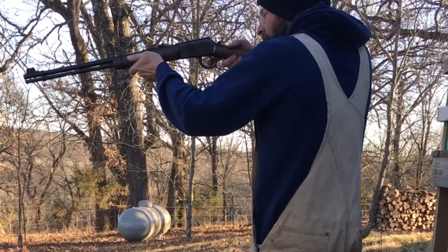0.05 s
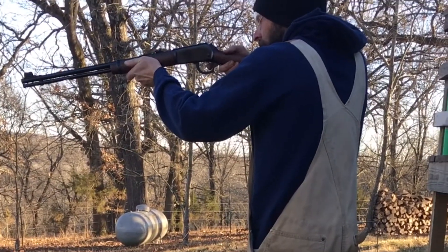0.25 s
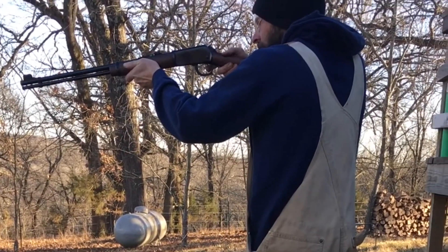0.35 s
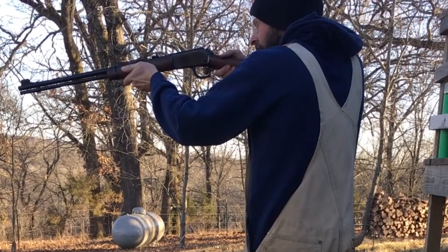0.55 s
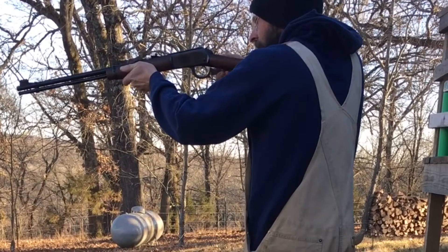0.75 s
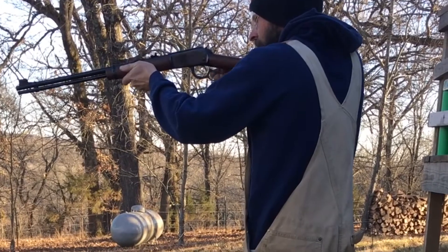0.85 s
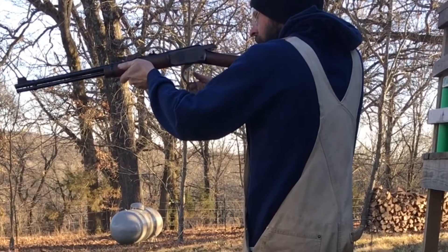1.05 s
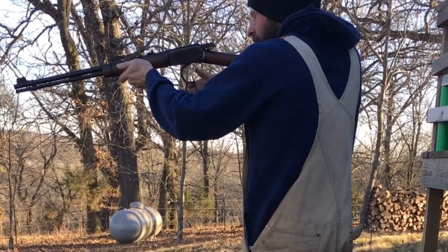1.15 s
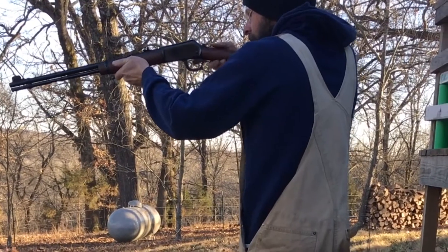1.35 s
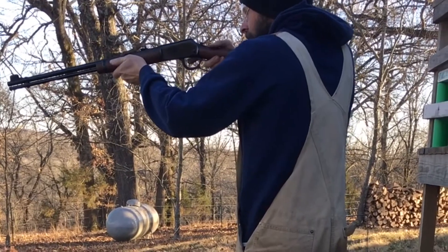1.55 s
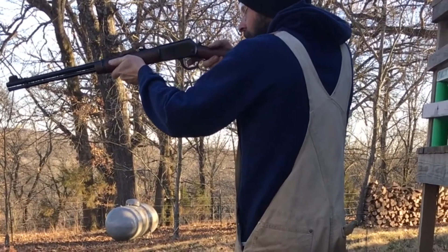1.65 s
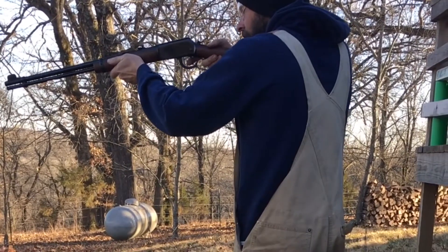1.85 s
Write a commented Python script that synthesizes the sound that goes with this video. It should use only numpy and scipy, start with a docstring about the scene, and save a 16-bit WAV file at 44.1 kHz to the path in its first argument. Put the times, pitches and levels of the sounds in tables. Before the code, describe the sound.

A rifle shot, a bullet hitting metal, echoes, then the lever clicking open and shut.

```python
"""A faint hum, like a far engine, lies under quiet outdoor air at the edge of a wood.
The hammer of a small-calibre lever-action rifle snaps, and the muzzle gas drives out one sharp report.
A moment later the bullet strikes metal and sets its modes ringing.
The report reflects off the trees as separate slaps and a rolling echo. As that dies away, the lever is
thrown open and snapped shut, steel on steel, and the spent case tings faintly on the ground."""
import sys
import numpy as np
from scipy import signal
from scipy.fft import rfft, irfft
from scipy.io import wavfile
from scipy.ndimage import uniform_filter1d

SR = 44100
rng = np.random.default_rng(int(sys.argv[2]) if len(sys.argv) > 2 else 0)


def waveform_to_disk(signal):
    """Save audio, clipped to [-1, 1], as 16-bit WAV at the path in sys.argv[1]."""
    frames = np.transpose(np.atleast_2d(signal))
    scaled = np.clip(frames, -1, 1) * 32767
    samples = np.round(scaled).astype(np.int16)
    wavfile.write(sys.argv[1], SR, samples)


N = 83790
TIME = np.arange(N) / SR

# pressure fronts: (time [s], level [dB], positive phase [s])
SHOCK_FRONTS = [(0.2185, -3, 0.00012), (0.2197, 1, .00055), (0.2224, -6, 0.00018), (0.2228, -3, 0.00064)]
# spectra of the muzzle gas and of its scatter from the ground: (frequency [Hz], level [dB])
GAS_SPECTRUM = [(40, -9), (120, -2), (230, 2.5), (430, 3.5), (850, -2.5), (1250, 5.5), (2000, 4),
                (2900, -1.5), (7000, -1.5), (11000, -5), (16000, -8)]
GROUND_SPECTRUM = [(40, -14.5), (200, -2.5), (700, -3.5), (1400, 6), (3000, -0.5), (7000, -2), (16000, -6)]
BLAST_S, BLAST_RISE_S, BLAST_HOLD_S, BLAST_T60, BLAST_DB = .216, .0045, .018, .12, -14.5
PUFF_S, PUFF_HZ, PUFF_WIDTH_S, PUFF_DB = .2221, 201, .0027, -6.5

def muzzle_blast():
    """Sudden expansion of gas: Friedlander waves and a low puff in a noisy rush that the ground scatters."""
    since = TIME - PUFF_S
    out = amp(PUFF_DB) * np.cos(2 * np.pi * PUFF_HZ * since) * np.exp(-(since / PUFF_WIDTH_S) ** 2)
    for s, db, positive_s in SHOCK_FRONTS:
        age = TIME / positive_s
        add(out, s, amp(db) * (1 - age) * np.exp(-age))
    rise = np.minimum(TIME / BLAST_RISE_S, 1)
    decay = np.exp(-np.log(1000) * np.maximum(TIME - BLAST_HOLD_S, 0) / BLAST_T60)
    add(out, BLAST_S, amp(BLAST_DB) * rise * decay * noise(GAS_SPECTRUM))
    add(out, BLAST_S + BLAST_HOLD_S, amp(-25.5) * burst(fade(t60=.4), GROUND_SPECTRUM))
    return out


BOOM_S, BOOM_DB = .2234, -4.5

def boom(start_hz=80, sag_s=.031, peak_s=.0072):
    """A damped low oscillation of pressure that begins with rarefaction and sags in pitch."""
    cycles = start_hz * sag_s * (1 - np.exp(-TIME / sag_s))
    age = TIME / peak_s
    return -np.sin(2 * np.pi * cycles) * (age * np.exp(1 - age)) ** .85


# spectrum of the impact: (frequency [Hz], level [dB])
IMPACT_SPECTRUM = [(50, 5), (250, -6.5), (430, -9.5), (620, -2), (850, -9), (1400, 1), (2000, 6.5),
                   (3500, -1), (8500, -2), (10500, -7), (16000, -6.5)]
# modes of the struck metal: (frequency [Hz], level [dB], T60 [s])
TARGET_MODES = [(1394, -15, .16), (1980, 1.5, 0.01), (2667, -0.5, .04), (2768, -9, 0.1), (3190, -16, .07),
                (4675, -10.5, 0.09), (6700, -0.5, 0.078), (6890, -2.5, 0.079), (8910, -6, .055),
                (11540, -12, .15), (12520, -8, 0.11), (14510, -14.5, .11)]

def bullet_hit(hit_s=.2873):
    """Impact excitation: a smack starts the metal's free vibration, which reverberates among the trees."""
    out = np.zeros(N)
    metal = amp(-13) * ring(TARGET_MODES)
    trees = rng.standard_normal(N) * fade(t60=1.3)
    add(out, hit_s, amp(-10.5) * burst(fade(t60=.05), IMPACT_SPECTRUM))
    add(out, hit_s, metal)
    add(out, hit_s, amp(-23.5) * signal.fftconvolve(metal, unit_energy(trees)))
    return out


# contacts of lever and bolt: (time [s], level [dB], tilt [dB/octave], T60 [s])
CONTACTS = [(.888, -54, -1, 0.11), (0.9018, -36, -2.5, .012), (0.93, -47, -2, 0.038),
            (0.9338, -36.5, -1.5, 0.018), (0.937, -43, -3, 0.14), (0.9556, -23, -2, 0.026),
            (1.198, -50, 6, 0.02), (1.205, -38.5, -0.5, 0.02), (1.209, -36.5, -2.5, 0.04),
            (1.2134, -44.5, -2, .02), (1.2242, -44, -1.5, 0.022), (1.237, -45, -5, 0.071),
            (1.2501, -37.5, -2.5, 0.028), (1.2545, -16, 2, 0.015), (1.2588, -19, 0.5, 0.021),
            (1.38, -62, -1.5, 0.36), (1.532, -60, 3.5, 0.1), (1.826, -66, 8, 0.039)]
# spectrum of a steel contact: (frequency [Hz], level [dB])
CONTACT_SPECTRUM = [(30, -35), (150, -22.5), (400, -18.5), (620, -10.5), (900, -3), (1150, 0), (1500, -1.5),
                    (2200, 2.5), (3200, -4), (4500, -1), (7500, 0), (10500, -2), (16000, -9.5)]
# modes of the receiver and of the small steel parts: (frequency [Hz], level [dB], T60 [s])
RECEIVER_MODES = [(606, -24, 0.27), (1229, -9, .08), (1422, -9.5, .04), (2055, -13, 0.043),
                  (2600, -9.5, 0.028), (3255, -7, 0.033), (4490, -7.5, 0.032), (5120, -11, 0.018),
                  (6090, -12, .025), (6850, -3.5, .02), (7220, -1, .02), (9860, -2.5, 0.016)]
SMALL_PART_MODES = [(10700, -0.5, 0.013), (11400, 1.5, 0.019), (12800, -14, 0.23), (13600, 3, 0.014),
                    (15420, -2, 0.018)]
# strikes on the small parts: (time [s], level [dB])
SMALL_PART_STRIKES = [(.9015, -37.5), (0.9338, -35), (1.2586, -40)]
# the lever meets its end stops: (time [s], level [dB], tilt [dB/octave])
END_STOPS = [(.9559, -20, 10), (1.209, -40, 7), (1.2545, -22.5, -5)]

def lever_action(grit_db=3.5, low_cut_hz=514):
    """Impact and friction: steel ticks, scrapes and rings; parts this small radiate little bass."""
    out = np.zeros(N)
    tick = amp(2.5) * fade(t60=.0012)
    for s, db, tilt_db, t60 in CONTACTS:
        grit = unit_rms(amp(grit_db * np.minimum(rng.exponential(1, N), 4)))
        add(out, s, amp(db) * burst(fade(t60) * grit + tick, CONTACT_SPECTRUM, tilt_db))
        add(out, s, amp(db - 6.5) * ring(RECEIVER_MODES, tilt_db))
    for s, db in SMALL_PART_STRIKES:
        add(out, s, amp(db) * ring(SMALL_PART_MODES))
    for s, db, tilt_db in END_STOPS:
        add(out, s, amp(db) * stock_knock(tilt_db))
    return signal.sosfilt(signal.butter(2, low_cut_hz, "highpass", fs=SR, output="sos"), out)


# hollow modes of the stock: (frequency [Hz], level [dB], T60 [s])
STOCK_MODES = [(963, -10.5, 0.049), (1179, -2.5, 0.045), (1405, -16, 0.04)]

def stock_knock(tilt_db):
    """Modal superposition: damped sines sum to a hollow clack, tilted about the middle mode."""
    middle_hz = np.median([mode[0] for mode in STOCK_MODES])
    return sum(amp(db + tilt_db * np.log2(hz / middle_hz)) * fade(t60) * np.sin(2 * np.pi * hz * TIME)
               for hz, db, t60 in STOCK_MODES)


# strikes of hammer and firing pin: (time [s], level [dB], tilt [dB/octave])
HAMMER_STRIKES = [(0.1965, -20.5, -1), (.208, -25, -1.5)]
# spectrum of their dry snap: (frequency [Hz], level [dB])
SNAP_SPECTRUM = [(40, -5.5), (300, 7), (1000, 1), (2000, 0), (4000, -9), (9000, -10.5), (16000, -18)]

def hammer(ground_delay_s=.0033):
    """Direct and reflected paths: each snap arrives twice, once off the ground, with a brief rattle."""
    out = np.zeros(N)
    for s, db, tilt_db in HAMMER_STRIKES:
        add(out, s, amp(db) * pulse(SNAP_SPECTRUM, tilt_db))
        add(out, s + ground_delay_s, amp(db - 1.5) * pulse(SNAP_SPECTRUM))
        add(out, s, amp(db - 14) * burst(fade(t60=.037), CONTACT_SPECTRUM))
    return out


# decay of the longer tail from the surroundings: (frequency [Hz], T60 [s])
TAIL_DECAY = [(100, 0.27), (1200, 0.41), (4000, 0.29), (15000, 0.27)]

def nearby_scatter(sound):
    """Reverberation by convolution: quick scatter from things close by, and a faint longer tail."""
    early = rng.standard_normal(N) * fade(t60=.11)
    late = die_away(rng.standard_normal(N), TAIL_DECAY)
    response = amp(-13) * unit_energy(early) + amp(-22) * unit_energy(late)
    return signal.fftconvolve(sound, response)[:N]


# spectrum of the report among the twigs: (frequency [Hz], level [dB])
TWIG_SPECTRUM = [(40, -1.5), (150, 7.5), (450, -0.5), (1400, 7.5), (3000, 4), (7000, -0.5), (12000, -1),
                 (16000, -5.5)]
# its decay: (frequency [Hz], T60 [s])
TWIG_DECAY = [(100, 2.7), (1500, 0.9), (4000, 1.7), (8000, 1.35), (16000, 0.98)]

def twig_wash(rise_s=.02):
    """Diffuse scattering: the nearest twigs spread the report into a bright wash."""
    out = np.zeros(N)
    wash = die_away(noise(TWIG_SPECTRUM), TWIG_DECAY)
    add(out, BLAST_S, amp(-34) * np.minimum(TIME / rise_s, 1) * wash)
    return out


# echoes off trunks and buildings: (time [s], front level [dB], scatter level [dB], scatter T60 [s])
SLAPS = [(0.3553, -23, -28, 0.057), (0.4024, -27.5, -43, 0.019), (0.463, -37, -30.5, 0.18),
         (0.4965, -4.5, -22, 0.073), (.5021, -11.5, -23.5, 0.042), (.513, -25, -29.5, 0.2),
         (.574, -14.5, -31, 0.039), (.608, -19, -33, 0.057), (0.6125, -20.5, -31.5, 0.17),
         (.686, -20.5, -37, 0.031), (.71, -25, -32, 0.08), (.76, -21, -39.5, 0.13)]
# spectrum of an echo: (frequency [Hz], level [dB])
SLAP_SPECTRUM = [(30, -35), (150, -15.5), (400, -15.5), (650, -3.5), (1300, -1.5), (2000, -3.5),
                 (3000, -14.5), (5000, -25), (16000, -56)]

def slap_echoes(blur_s=.00007, boom_return_s=.49):
    """Discrete reflections: each front, rounded by distance, trails scatter; the boom returns once."""
    out = np.zeros(N)
    blur = signal.windows.gaussian(21, blur_s * SR)
    front = np.convolve(pulse(SLAP_SPECTRUM), blur / blur.sum())
    for s, front_db, scatter_db, t60 in SLAPS:
        add(out, s, amp(front_db) * front)
        add(out, s, amp(scatter_db) * burst(fade(t60), SLAP_SPECTRUM))
    add(out, boom_return_s, amp(-36) * boom())
    return out


# envelope of the wood's rolling echo: (time [s], level [dB])
ROLL_ENVELOPE = [(.22, -100), (.31, -38), (.42, -45), (.53, -37.5), (.64, -34.5), (.77, -37.5), (.9, -43),
                 (1.02, -50), (1.18, -61.5), (1.4, -82), (1.9, -91)]
# spectrum of one trunk's reflection: (frequency [Hz], level [dB])
TRUNK_SPECTRUM = [(100, -30.5), (380, -26), (620, -7), (850, -4.5), (1350, 0.5), (1900, -6.5),
                  (2600, -17.5), (4000, -28), (8000, -46), (16000, -61)]

def rolling_echo(trunks_per_s=3500, spread_db=4):
    """Incoherent summation: randomly timed reflections from countless trunks merge into a roll."""
    arrivals = (rng.random(N) < trunks_per_s / SR) * rng.choice([-1, 1], N)
    strengths = amp(spread_db * np.clip(rng.standard_normal(N), -2, 2))
    roll = unit_rms(signal.fftconvolve(arrivals * strengths, pulse(TRUNK_SPECTRUM))[:N])
    return roll * amp(np.interp(TIME, *np.transpose(ROLL_ENVELOPE)))


# the case lands and bounces: (time [s], level [dB])
CASE_IMPACTS = [(1.44, -63), (1.875, -74)]
# modes of the case: (frequency [Hz], level [dB], T60 [s])
BRASS_MODES = [(3100, -5, .09), (4300, 0.5, 0.25), (5123, -10, .1), (9550, -14, 0.17), (12600, -26, .15)]

def spent_case():
    """Free vibration of a brass shell: a faint ting at each landing."""
    out = np.zeros(N)
    for s, db in CASE_IMPACTS:
        add(out, s, amp(db) * ring(BRASS_MODES))
    return out


# course of the hum: (time [s], pitch [Hz], level [dB])
HUM_COURSE = [(0, 117.2, -54.5), (.18, 121.5, -61), (.3, 114, -69), (.65, 116, -62.5), (.78, 115.7, -51.5),
              (1.3, 116.5, -52.5), (1.7, 115.2, -54), (1.9, 112.8, -55.5)]
# its partials: (multiple of the pitch [1], level [dB])
HUM_PARTIALS = [(.5, -14.5), (1, 1.5), (1.5, -29), (2, -16)]

def hum(waver_depth=.0023):
    """Frequency modulation: the partials of a low tone waver together; the level dips around the shot."""
    times, hz, db = np.transpose(HUM_COURSE)
    waver = unit_rms(uniform_filter1d(rng.standard_normal(N), size=3000))
    cycles = np.cumsum(np.interp(TIME, times, hz) * (1 + waver_depth * waver)) / SR
    tone = sum(amp(level) * np.sin(2 * np.pi * (multiple * cycles + rng.random()))
               for multiple, level in HUM_PARTIALS)
    return unit_rms(tone) * amp(np.interp(TIME, times, db))


# spectrum of the outdoor air: (frequency [Hz], level [dB])
AIR_SPECTRUM = [(20, -12), (40, -0.5), (65, 11.5), (100, 4.5), (170, -0.5), (300, -7.5), (450, -13),
                (650, -3), (900, -7), (1250, -4), (1800, -9.5), (2600, -21), (5000, -27), (15000, -29.5)]

def outdoor_air():
    """Stationary ambient noise, strongest in the bass."""
    return amp(-59.5) * noise(AIR_SPECTRUM)


def ring(modes, tilt_db=0, size=12000, split_hz=53, line_width_hz=30):
    """Beating: each damped mode of struck metal is a close pair; the tilt pivots on the median mode."""
    middle_hz = np.median([mode[0] for mode in modes])
    t, out = TIME[:size], np.zeros(size)
    upper_gain = amp(-5.5)
    for hz, db, t60 in modes:
        lower_phase, upper_phase, split = rng.random(3)
        # a random walk of phase broadens each line and roughens the ring
        drift = np.cumsum(rng.standard_normal((2, size)), 1) * np.sqrt(2 * np.pi * line_width_hz / SR)
        drift = uniform_filter1d(drift, size=64, axis=1)
        upper_hz = hz + split_hz * (.5 + split)
        lower = np.sin(2 * np.pi * (hz * t + lower_phase) + drift[0])
        upper = upper_gain * np.sin(2 * np.pi * (upper_hz * t + upper_phase) + drift[1])
        out += amp(db + tilt_db * np.log2(hz / middle_hz)) * fade(t60)[:size] * (lower + upper)
    return out / np.hypot(1, upper_gain)


def pulse(spectrum, tilt_db=0, size=2048):
    """Minimum-phase impulse response of a spectrum tilted per octave, with peak 1."""
    hz = abs(np.fft.fftfreq(size, 1 / SR))
    log_gain = np.log(amp(at_frequency(spectrum, hz) + tilt_db * np.log2(hz + 20)))
    response = np.exp(np.conj(signal.hilbert(log_gain)))
    shape = np.fft.ifft(response).real[:size // 2]
    return shape / abs(shape).max()


def burst(envelope, spectrum, tilt_db=0, size=12000):
    """Superposition of like pulses of random sign under an envelope."""
    impulses = envelope[:size] * rng.choice([-1, 1], size)
    return signal.fftconvolve(impulses, unit_energy(pulse(spectrum, tilt_db)))


def noise(spectrum):
    """Spectral shaping of white noise, with rms 1."""
    gain = amp(at_frequency(spectrum, np.fft.rfftfreq(N, 1 / SR)))
    return unit_rms(irfft(rfft(rng.standard_normal(N)) * gain, N))


def die_away(sound, t60s, size=256):
    """Frequency-dependent damping: each band decays at its own rate."""
    hz, t, bands = signal.stft(sound, SR, nperseg=size)
    decay = np.exp(-np.log(1000) * t / at_frequency(t60s, hz)[:, None])
    return signal.istft(bands * decay, SR, nperseg=size)[1][:N]


def fade(t60):
    """Exponential decay by 60 dB in t60 seconds."""
    return np.exp(-np.log(1000) * TIME / t60)


def at_frequency(table, hz):
    """Interpolation on a log-frequency axis."""
    frequencies, values = np.transpose(table)
    return np.interp(np.log(hz + 1), np.log(frequencies), values)


def amp(db):
    """Decibels to amplitude ratio."""
    return 10 ** (np.asarray(db) / 20)


def unit_rms(x):
    """Normalisation to rms 1."""
    return x / np.sqrt(np.mean(x ** 2) + 1e-20)


def unit_energy(x):
    """Normalisation to energy 1."""
    return x / np.linalg.norm(x)


def add(mix, s, sound):
    """Superposes a sound on the mix from time s."""
    part = mix[round(s * SR):][:len(sound)]
    part += sound[:len(part)]


def scene():
    """Linear superposition of rifle, bullet strike, echoes and background, in mono."""
    direct = hammer() + muzzle_blast() + bullet_hit() + lever_action()
    out = direct + nearby_scatter(direct) + spent_case()
    add(out, BOOM_S, amp(BOOM_DB) * boom())
    out += twig_wash() + slap_echoes() + rolling_echo()
    out += hum() + outdoor_air()
    return out[None]


def record(dry, cutoff_hz=16100):
    """Overload and band limiting: the peaks clip, then a low-pass removes the highest treble."""
    lowpass = signal.firwin(301, cutoff_hz, window=("kaiser", 9), fs=SR)
    return signal.oaconvolve(np.clip(dry, -1, 1), lowpass[None], "same")


dry = scene()
out = record(dry)
waveform_to_disk(out)
```